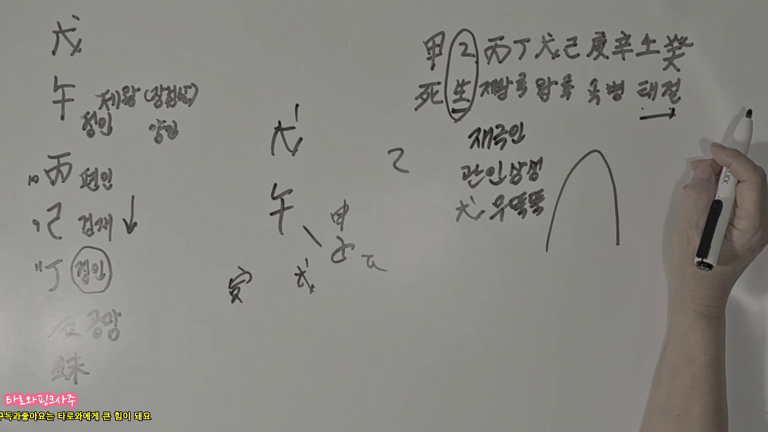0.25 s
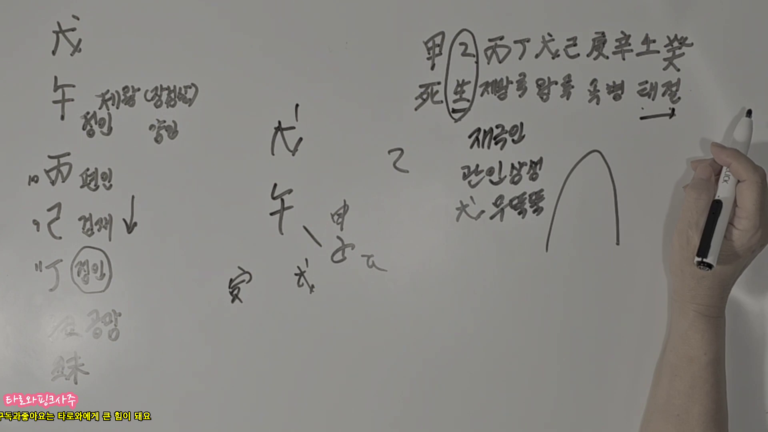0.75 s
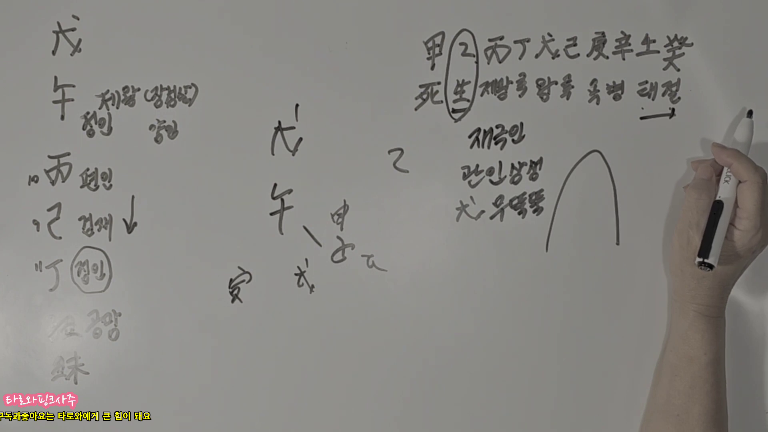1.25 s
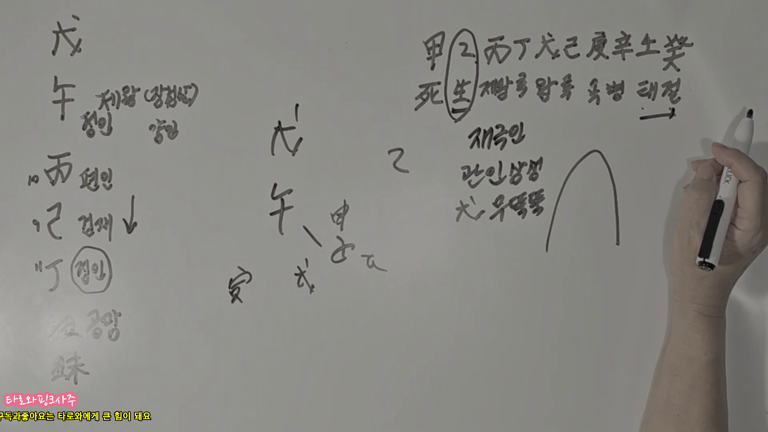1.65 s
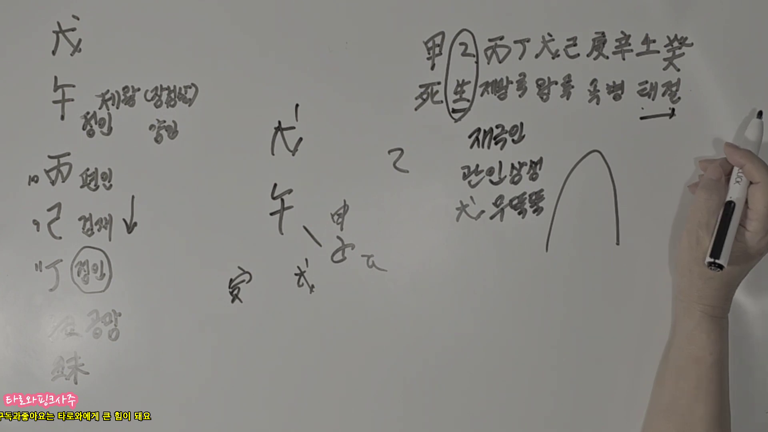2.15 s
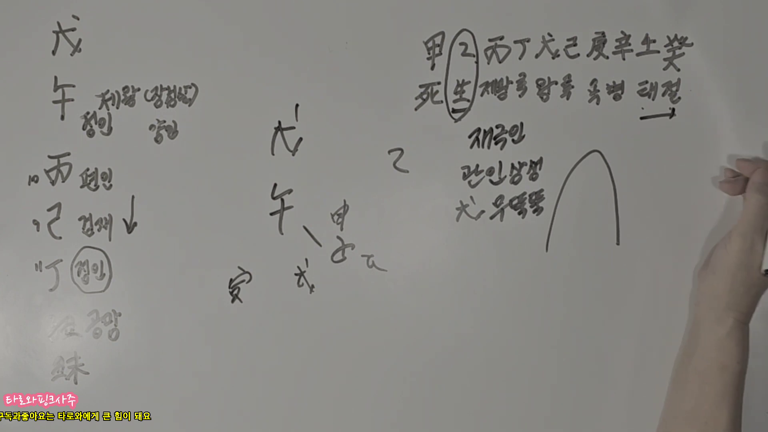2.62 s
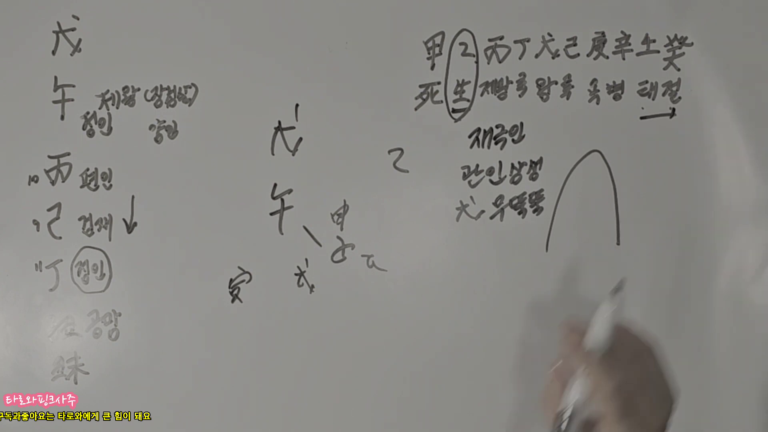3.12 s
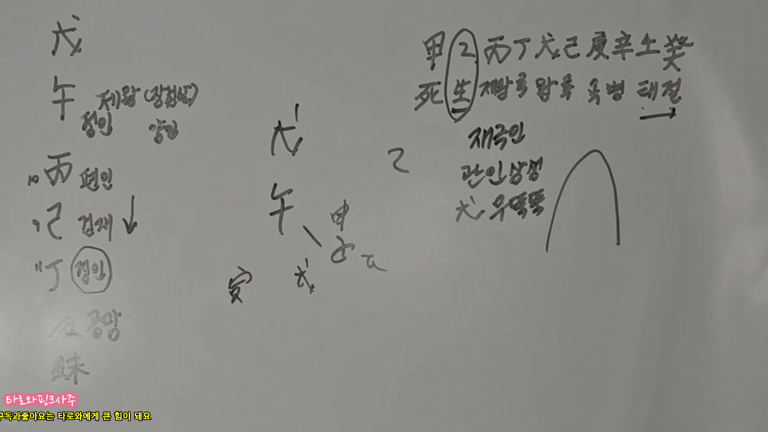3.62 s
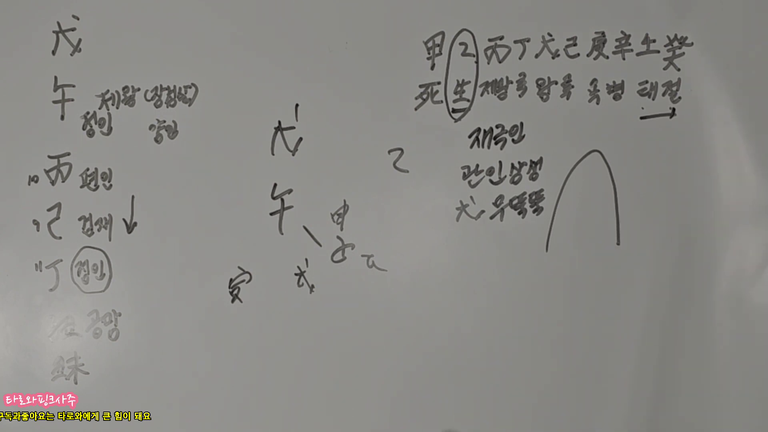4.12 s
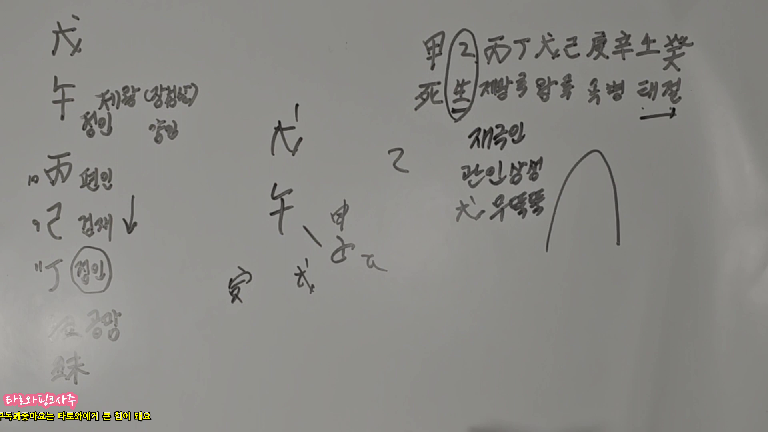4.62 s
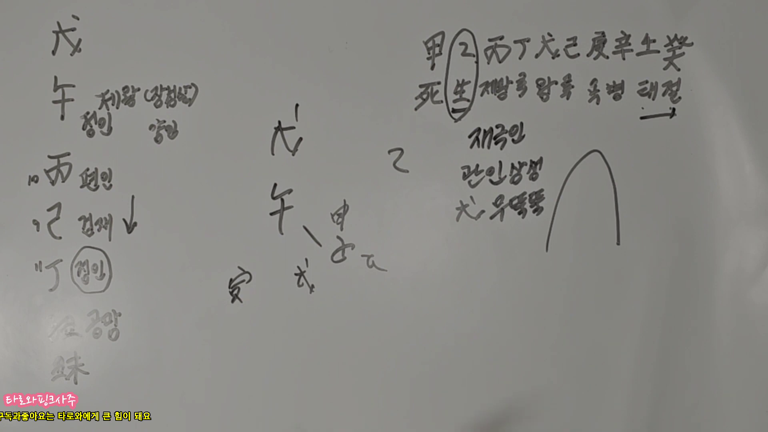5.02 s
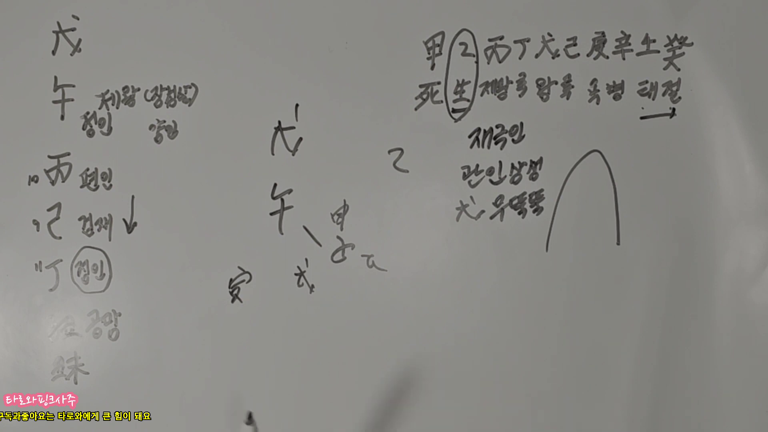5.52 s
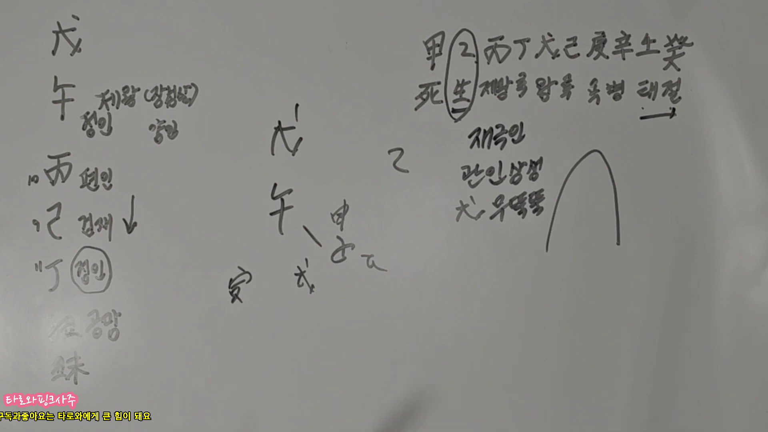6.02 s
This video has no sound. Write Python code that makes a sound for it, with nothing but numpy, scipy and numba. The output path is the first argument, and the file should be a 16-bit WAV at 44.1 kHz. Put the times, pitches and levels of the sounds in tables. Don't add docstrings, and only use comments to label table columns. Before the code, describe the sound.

A small room hums low and steadily, slowly throbbing, with soft hiss. After a few very faint taps, a hand skims dryly along a whiteboard and stops with a hard knuckle knock and a low thump. Light marker rattles and short scuffs follow close to the microphone, thinning out to a hollow bump, then a felt eraser rubs softly and presses harder at the very end.

```python
import sys
import numpy as np
from scipy import signal
from scipy.fft import rfft, irfft
from scipy.io import wavfile
from scipy.ndimage import uniform_filter1d
from numba import njit

SR = 44100
rng = np.random.default_rng(int(sys.argv[2]) if len(sys.argv) > 2 else 0)


def volts_from_db(level):
    exponent = np.asarray(level, float) / 20
    return 10 ** exponent


def to_wav(s):
    ch = np.atleast_2d(s).T
    pcm = np.round(np.clip(ch, -1, 1) * 32767)
    wavfile.write(sys.argv[1], SR, pcm.astype(np.int16))


N = 276066
TIME = np.arange(N) / SR

# centre in Hz, width in Hz, level in dB.
SHELL = [(1283, 240, 1.5), (1600, 180, 5), (1870, 230, 5), (2350, 500, 3), (2900, 620, 0.5)]
BOARD = [(348, 128, 0.5), (680, 170, -1.5), (830, 150, -1), (1000, 150, -3)]
EDGE = [(3540, 1560, -2.5), (4550, 640, 2.5), (6000, 2900, -2.5)]
GRIT = [(7100, 2800, 0), (9600, 9500, -3.5), (13000, 2800, -3)]


@njit
def svf(x, hz, width):
    y, band, low = np.empty(len(x)), 0., 0.
    g, k = np.tan(np.pi * hz / SR), width / hz
    for i in range(len(x)):
        v = (band + g * (x[i] - low)) / (1 + g * (g + k))
        band = 2 * v - band
        low += 2 * g * v
        y[i] = k * v
    return y


def body(x, modes):
    power, out = 0, 0
    for k, (hz, width, db) in enumerate(modes):
        power += volts_from_db(2 * db) * np.pi * width / SR
        out = out + (-1) ** k * volts_from_db(db) * svf(x, 1. * hz, 1. * width)
    return out / np.sqrt(power)


def walk(rate):
    hold = int(SR / rate)
    steps = np.repeat(rng.standard_normal(N // hold + 1), hold)
    return 0.76 * uniform_filter1d(uniform_filter1d(steps, hold), hold)[:N]


def stroke(table):
    s, press_db, light_db = np.transpose(table)
    inside = np.clip(np.minimum(TIME - s[0], s[-1] + .006 - TIME) / .006, 0, 1)
    return inside * volts_from_db(np.interp(TIME, s, press_db)), np.interp(TIME, s, light_db)


def scuff(s, peak_db, rise_s, fall_s, light_db):
    return volts_from_db(peak_db - 20 * np.maximum((s - TIME) / rise_s, (TIME - s) / fall_s)), light_db


def rub(strokes, bodies, shares, grain_db, flutter_db):
    grip, out = walk(40) + 1.5 * walk(130), 0
    for modes, (share_db, slope) in zip(bodies, shares):
        force = sum(press * volts_from_db(share_db + slope * light_db) for press, light_db in strokes)
        clicks = rng.standard_normal(N) * volts_from_db(grain_db * rng.exponential(size=N))
        flutter = volts_from_db(flutter_db * (grip + 0.52 * walk(25)))
        out += body(force * flutter * clicks / clicks.std(), modes)
    return out


def hand_slides():
    # time in seconds, pressure in dB, lightness in dB.
    slide = [
        (2.52, -66, 2),
        (2.575, -60.5, 5),
        (2.615, -51.5, 5.5),
        (2.68, -51, 2.5),
        (2.74, -50, 2.5),
        (2.782, -43.5, 0.5),
        (2.815, -52, 1.5),
        (2.862, -49, 3),
        (2.882, -42, 3.5),
    ]
    # peak in seconds, peak in dB, rise and fall in seconds per 20 dB, lightness in dB.
    scuffs = [
        (2.883, -52, .004, .025, -3),
        (2.976, -54, 0.25, 0.075, -1),
        (3.468, -55.5, 0.058, 0.2, 0),
        (3.572, -67, .012, 0.074, -2),
        (3.695, -67, .05, .4, -1),
        (3.89, -55.5, .013, 0.072, -9),
        (4.075, -59, .03, 0.047, -3),
        (4.214, -63, 0.37, 0.14, -16),
        (4.536, -73, 0.17, 0.081, 16),
        (6.071, -65, 0.041, 0.045, 16),
    ]
    # level in dB, slope in dB per dB of lightness.
    balance = [(1, 0), (-4, 0.4), (0.5, 0.86), (-2.5, 1.43)]
    strokes = [stroke(slide)] + [scuff(*row) for row in scuffs]
    return rub(strokes, (SHELL, BOARD, EDGE, GRIT), balance, grain_db=2.5, flutter_db=.9)


def eraser_wipe():
    # time in seconds, pressure in dB, lightness in dB.
    wiping = [
        (5.76, -71, 0),
        (5.815, -62.5, 4),
        (5.885, -57.5, -3),
        (6.02, -68.5, -6),
        (6.13, -62, -2),
        (6.2, -52.5, -17),
        (6.244, -42, -12),
        (6.26, -51, -1),
    ]
    # centre in Hz, width in Hz, level in dB.
    block = [(1108, 40, -6), (1310, 90, -7), (1560, 350, -10), (1908, 80, -1), (2060, 110, -3),
             (2260, 90, -1.5), (2730, 180, -11), (3050, 250, -17)]
    drum = [(323, 81, 3), (490, 68, -2), (614, 100, -12)]
    dust = [(4540, 900, -2), (6100, 460, 4), (8950, 4700, -6), (14200, 2000, -5)]
    # level in dB, slope in dB per dB of lightness.
    balance = [(1, 0), (4, 0.2), (-3, 0.3)]
    return rub([stroke(wiping)], (block, drum, dust), balance, grain_db=2.4, flutter_db=.6)


def taps():
    # start in seconds, force in dB, weight on the panel in dB, hardness in dB.
    touches = [(1.0146, -53, -10, -7), (2.315, -53.5, -1, 8.5), (2.8085, -52, -7, -5),
               (2.9735, -54, 2, 8.5), (3.0085, -51, -4, -3), (3.3707, -53, -6, -7), (3.425, -55, -9, 6.5),
               (3.432, -54, -11, 5), (3.459, -65, 0, 14), (3.472, -55, 3, -10), (3.479, -48, 1, -19),
               (3.5045, -50, 2, -12), (3.572, -50.5, 1.5, -4), (3.7382, -57, 5, -1), (3.8885, -50, 1, 2),
               (3.9102, -58, -2, -9), (4.05, -54, -3, -15), (4.2, -57, 8.5, -1), (4.2795, -60, 9, -6),
               (4.3245, -65, -6, 11.5), (4.7858, -66, 11, 12), (5.246, -61, 6, -6)]
    t60_s, dust_db = 0.068, -5.5
    drive, after = np.zeros((4, N + SR)), np.arange(SR // 4) / SR
    for s, force_db, weight_db, hard_db in touches:
        levels_db = (0, weight_db, hard_db, hard_db + dust_db)
        for row, db, quick in zip(drive, levels_db, (1.0, 0.83, 0.8, 0.62)):
            rattle = rng.standard_normal(len(after)) * np.minimum(after / 0.0029, 1)
            rattle[0] = 4.5
            fade = volts_from_db(force_db + db + 2.5 - 60 * quick * after / t60_s)
            row[int(s * SR):][:len(after)] += fade * rattle
    return sum(body(row[:N], modes) for row, modes in zip(drive, (SHELL, BOARD, EDGE, GRIT)))


def thuds():
    ringers = {"panel": [(463, -3.5, 0.12), (740, -5.5, 0.12), (1260, -3, 0.1), (2000, -6.5, .027)],
               "knuckle": [(240, 0, .022), (420, -5, .018), (680, -6.5, .02), (920, -9, .016),
               (1900, -12, .014)], "frame": [(95, 1, 0.15), (55.6, -3, 0.52)],
               "barrel": [(694, -6.5, 0.053), (1030, -5, 0.041), (1310, -1.5, 0.055), (2030, -2, 0.046)],
               "cap": [(974, -0.5, 0.055), (1140, 2.5, 0.048), (1540, 3.5, .1), (1750, -4, 0.11),
               (2710, 3.5, 0.066), (4300, -2.5, 0.047)], "clasp": [(3450, -7, .073), (4600, -1.1, 0.081),
               (11500, 0.5, 0.14)]}
    # start in seconds, peak at 1 kHz in dB, tilt in dB per octave, thing that rings.
    blows = [
        (1.016, -56, -11, "panel"),
        (2.8083, -40, 5.5, "barrel"),
        (2.8818, -21, 0, "knuckle"),
        (2.961, -24, 0.5, "frame"),
        (3.478, -38, -6.5, "barrel"),
        (4.05, -45, 0, "cap"),
        (5.245, -44, -1.5, "panel"),
        (6.063, -51, 1, "clasp"),
    ]
    out, after = np.zeros(N + SR), np.arange(SR // 3) / SR
    for s, blow_db, tilt_db, thing in blows:
        for hz, db, t60 in ringers[thing]:
            crowd = min(hz / 2200, 1)
            cluster = svf(rng.standard_normal(len(after)), 1. * hz, .14 * hz)
            pure = np.sin(2 * np.pi * hz * after)
            ring = np.sqrt(1 - crowd ** 2) * pure + crowd * cluster / cluster.std() / np.sqrt(2)
            peak_db = blow_db + db + tilt_db * np.log2(hz / 1000)
            onset = np.minimum(2 * hz * after, 1)
            out[int(s * SR):][:len(after)] -= volts_from_db(peak_db - 60 * after / t60) * onset * ring
    return out[:N]


def room(x):
    t60_s, tail_db = .12, -18
    after = np.arange(SR // 4) / SR
    fade = volts_from_db(-60 * after / t60_s) * (after > .004)
    tail = svf(rng.standard_normal(len(after)), 920.0, 3000.) * fade
    return x + volts_from_db(tail_db) * signal.fftconvolve(x, tail / np.linalg.norm(tail))[:N]


def tone(db, hz, lead_hz, swell_s, turn):
    return volts_from_db(db) * np.sqrt(2) * np.cos(2 * np.pi * (turn + lead_hz * swell_s + hz * (TIME - swell_s)))


def compressors():
    motor_hz = (58.604, 58.499, 58.893)
    # multiple of shaft speed, levels of motors 1, 2 and 3 in dB,
    # then the times in seconds when motor 2 and motor 3 swell with motor 1.
    hum = [(1.0, -53.0, -48.7, -54.3, 3.33, 2.04), (2.0, -53.3, -49.7, -52.3, 1.68, 1.48),
           (3.0, -65.9, -70.8, -53.0, 0.26, 0.12), (4.0, -44.9, -74.7, -55.9, 1.57, 0.29),
           (5.0, -68.3, -74.9, -72.5, 1.3, 0.51), (6.0, -66.9, -74.0, -77.1, 0.01, 0.09),
           (8.0, -87.5, -97.3, -103.6, 0.38, 0.19)]
    mains_hz, mains_db, mains_swell_s = 119.942, -58.5, .336
    turns = rng.random(len(hum))
    out = tone(mains_db, mains_hz, 2 * motor_hz[0], mains_swell_s, turns[1])
    for (k, *db, swell_2, swell_3), turn in zip(hum, turns):
        for hz, level_db, swell_s in zip(motor_hz, db, (0, swell_2, swell_3)):
            out += tone(level_db, k * hz, k * motor_hz[0], swell_s, turn)
    return out


def air():
    # frequency in Hz, density in dB per Hz.
    rumble = [(25, -98), (36, -87), (46, -73), (110, -72.5), (240, -73), (330, -81), (480, -90.5)]
    hiss = [(800, -96.5), (1400, -96.5), (2100, -100), (3000, -97), (6000, -97.5), (11000, -99),
            (15000, -99)]
    # centre in Hz, width in Hz, level in dB.
    room_modes = [(44, 3, -58), (78.2, 8.6, -55), (106.4, 3, -59.5), (125.9, 3.1, -55.5), (155, 6.9, -60.5)]
    hollow_db, hollow_wander_db = -2.5, 6.2
    hz, db = np.transpose(rumble + hiss)
    bins = np.arange(1, N // 2 + 2) * SR / N
    colour = volts_from_db(np.interp(np.log(bins), np.log(hz), db))
    floor = irfft(rfft(rng.standard_normal(N)) * colour, N) * np.sqrt(SR / 2)
    floor += (volts_from_db(hollow_db + hollow_wander_db * walk(2.61)) - 1) * svf(floor, 1850.0, 870.0)
    floor += (volts_from_db(0.8 * walk(3.53)) - 1) * svf(floor, 790.0, 600.)
    for f, width, mode_db in room_modes:
        mode = svf(rng.standard_normal(N), 1. * f, 1. * width) * np.sqrt(SR / np.pi / width)
        floor += volts_from_db(mode_db + 0.79 * walk(2.7)) * mode
    return floor


def apart():
    out = volts_from_db(-78) * svf(rng.standard_normal(N), 13500., 9000.)
    window = np.hanning(2048) ** .5
    for when, where in rng.random((45, 2)):
        hz = 4200 + 10800 * where ** 1.28
        patch = svf(svf(rng.standard_normal(len(window)), hz, 0.22 * hz), hz, 0.22 * hz)
        out[int(when * (N - len(window))):][:len(window)] += volts_from_db(-57) * window * patch
    return out * np.array([[1], [-1]])


def scene():
    contacts = room(hand_slides() + eraser_wipe() + taps())
    return np.tile(contacts + thuds() + compressors() + air(), (2, 1))


def roll_off(x):
    return signal.sosfilt(signal.butter(12, 16890, fs=SR, output="sos"), x)


def record(dry):
    bass_cut = signal.butter(2, 33, "high", fs=SR, output="sos")
    top_cut = signal.ellip(12, .3, 70, 15800, fs=SR, output="sos")
    mix = signal.sosfilt(np.r_[bass_cut, top_cut], dry + apart())
    return roll_off(mix)


dry = scene()
out = record(dry)
to_wav(out)
```